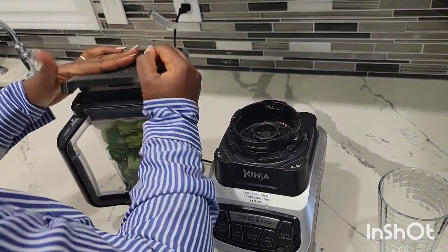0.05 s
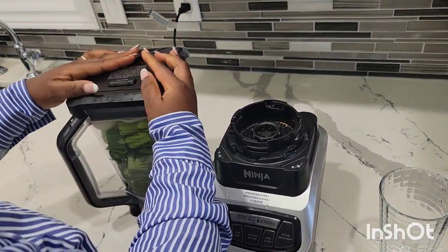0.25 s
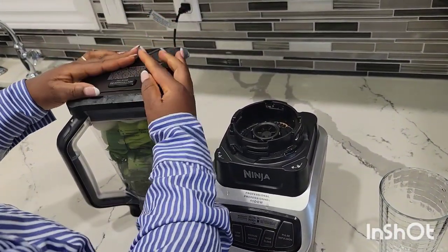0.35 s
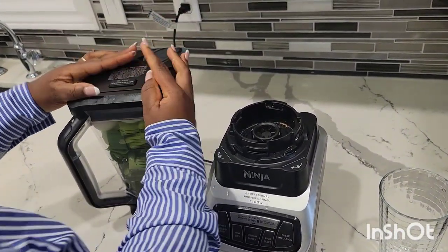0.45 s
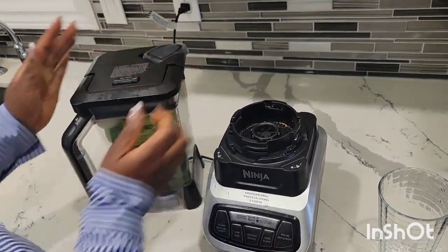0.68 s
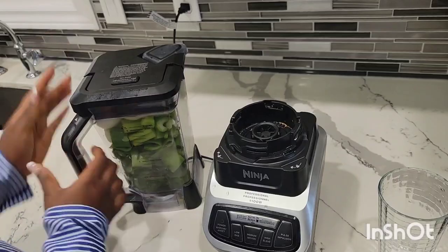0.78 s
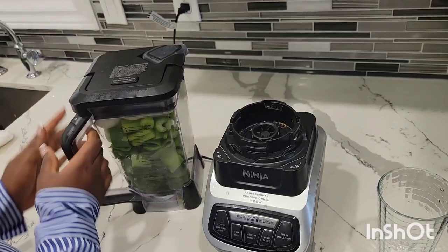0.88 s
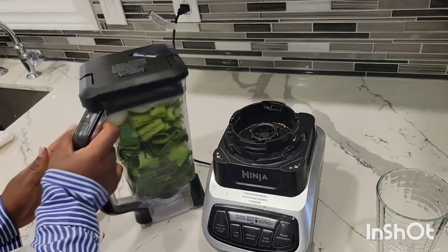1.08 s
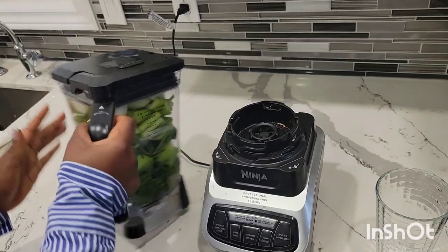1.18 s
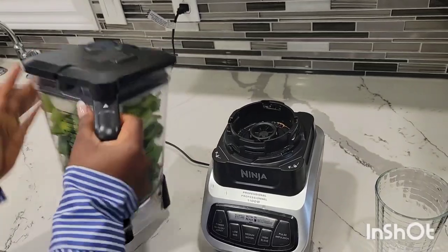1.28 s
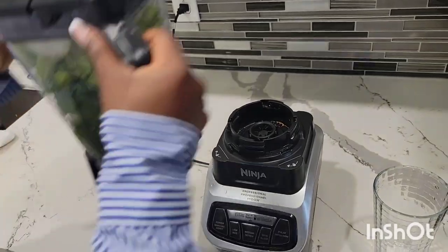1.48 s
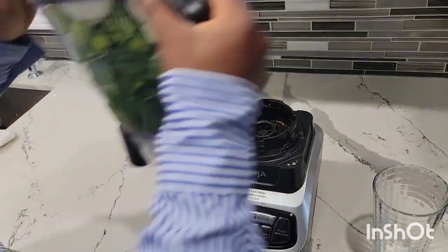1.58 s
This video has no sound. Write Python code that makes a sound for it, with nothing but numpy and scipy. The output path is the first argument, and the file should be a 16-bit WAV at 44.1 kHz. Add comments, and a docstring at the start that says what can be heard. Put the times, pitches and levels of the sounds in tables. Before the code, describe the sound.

One sharp plastic snap closes a blender lid, with small clicks before and after. Then come a dull bump, a short scrape and faint handle ticks, near the microphone in a small, slightly echoing kitchen, with soft hand rubbing.

```python
"""In a small, hard, quiet kitchen, a plastic blender lid is pressed onto its jar. It ticks, snaps home
and creaks as it settles: each contact makes the plastic crack, clatter and ring. The jar is then
gripped, bumps and skids on the stone counter and is lifted, its handle ticking under the weight.
Fingers pat the plastic, and hands and sleeves rub. The jar stands to the left; the room echoes it."""
import sys
import numpy as np
from scipy import signal
from scipy.fft import rfft, irfft, next_fast_len
from scipy.io import wavfile
from scipy.ndimage import map_coordinates

SR = 44100
rng = np.random.default_rng(int(sys.argv[2]) if len(sys.argv) > 2 else 0)


def dump(signal):
    """Clip the signal to [-1, 1] and save it as 16-bit WAV at the path in sys.argv[1]."""
    limited = np.clip(np.atleast_2d(signal).T, -1, 1)
    pcm = np.round(limited * 32767).astype(np.int16)
    wavfile.write(sys.argv[1], SR, pcm)


N = 72765

# Plastic contacts of lid and jar. A fade time (t60) is how long a sound takes to drop by 60 dB.
# (time [s], level [dB], brightness [dB/octave], fade time [s], favoured pitch [Hz], treble limit [Hz])
CONTACTS = [(0.012, -34, 2.5, 0.061, 2100, 3640), (0.0489, -30.5, -2, 0.063, 1620, 7000),
            (0.079, -29.5, -1, 0.11, 2600, 6600), (.101, -30.5, -3, 0.061, 2020, 5000),
            (.159, -24, 0.5, 0.091, 4800, 9800), (0.174, -30.5, -3, 0.12, 2400, 7000),
            (0.1934, -28.5, -5.5, .05, 1900, 7000), (0.2173, -24.5, -9, 0.031, 1820, 5000),
            (.2225, -16, 2.5, 0.12, 1910, 7000), (.230, -0.5, 0.5, 0.041, 1255, 18100),
            (0.2359, -5, -1, 0.051, 1887, 14720), (0.478, -25, -5, 0.019, 1960, 2300),
            (0.504, -31, 2, 0.1, 2660, 18000), (0.527, -34, 0.5, 0.13, 1970, 15000),
            (0.538, -39, -7.5, 0.12, 2000, 14000), (0.577, -29.5, 0.5, 0.16, 1760, 14800),
            (0.596, -31, 0.5, 0.096, 1750, 14000), (0.609, -37.5, 6.5, 0.017, 1840, 12000),
            (.868, -44.5, -3, 0.085, 801, 3030), (1.023, -32.5, -1, 0.086, 3200, 14000),
            (1.038, -38.5, 4.5, 0.12, 3370, 5000), (1.138, -33, 2, .12, 2570, 7000),
            (1.631, -39.5, 7.5, 0.035, 1600, 4000)]


def lid_clicks():
    """Each contact cracks and clatters the shell, with its own brightness and treble limit."""
    # Tone of the shell's many short vibrations, and of the crack: (frequency [Hz], level [dB])
    shell_tone = [(60, -17.5), (180, -5), (400, -10), (700, -9), (1150, 1.5), (2100, -2.5), (2600, -8),
                  (4000, -14), (6300, -17.5), (9000, -22.5), (15000, -24.5)]
    crack_tone = [(300, -28), (1500, 6), (6000, 1), (10000, -15), (15000, -20)]
    out, hz = np.zeros((2, N)), np.geomspace(30, SR / 2, 200)
    for start, db, brightness, t60, favoured_hz, top_hz in CONTACTS:
        # each point of contact favours one part of the shell
        boost_db = 8.5 * np.exp(-(np.log2(hz / favoured_hz) / 0.21) ** 2)
        tone = np.column_stack([hz, look_up(shell_tone, hz) + boost_db])
        clatter = amp(-7) * shape_tone(puff(t60), tone, brightness)
        crack = amp(-17.5) * shape_tone(puff(t60=0.0019), crack_tone, brightness)
        soften = signal.butter(2, top_hz, fs=SR)
        add(out, start, amp(db) * signal.lfilter(*soften, clatter + crack))
    return out


def lid_ring():
    """The same contacts make the lid ring and stir one low hum of the room."""
    # The lid's ringing notes, plus one low hum of the room: (pitch [Hz], level [dB], fade time [s])
    notes = [(226, -17, .52), (508, -25, .28), (767, -19, .15), (948, -9, .06), (1190, -17, .25),
             (1244, -3, .07), (1335, -20, .16), (1427, -19, .2), (1660, -4, .3), (1696, -4, .16),
             (1938, -4, .26), (2110, -2, .06)]
    out, t = np.zeros((2, N)), clock()
    for start, db, brightness, *_ in CONTACTS:
        ring = np.zeros_like(t)
        for hz, note_db, t60 in notes:
            strength = amp(note_db - 0.1 * rng.normal())
            ring += strength * fade(t60) * np.sin(2 * np.pi * (hz * t + rng.random()))
        add(out, start, amp(db - 13 - abs(brightness)) * ring * rise(0.00027))
    return out


def jar_bumps():
    """The full jar bumps on its feet; some bumps wake the room's low boom."""
    # Soft bumps on the counter: (time [s], level [dB], pitch [Hz], fade time [s])
    bumps = [(.082, -51.5, 211.7, 0.36), (0.122, -34.5, 198, 0.058), (0.2235, -28, 189, 0.1),
             (0.483, -33.5, 185, 0.044), (0.494, -39, 95, 0.098), (.602, -37.5, 88, 0.11),
             (.828, -53, 112, 0.089), (.875, -50.5, 90, 0.086), (0.983, -44, 91, 0.04),
             (1.027, -20.5, 162, 0.04), (1.04, -22, 121, 0.055), (1.051, -24.5, 70.5, 0.06),
             (1.0872, -32.5, 85, 0.094)]
    # The dull noise in each bump: (frequency [Hz], level [dB])
    thud_tone = [(40, 0), (200, -1.5), (400, -15), (800, -15.5), (2000, -47), (8000, -72)]
    # The room booming: (time [s], level [dB], fade time [s])
    booms = [(.24, -31, 0.31), (0.604, -48, 0.51), (1.037, -41, 0.64)]
    out, t, room_hz = np.zeros((2, N)), clock(), 65
    for start, db, hz, t60 in bumps:
        add(out, start, amp(db) * np.sin(2 * np.pi * hz * t) * fade(t60) * rise(0.0011))
        add(out, start, amp(db - 12) * shape_tone(puff(t60), thud_tone))
    for start, db, t60 in booms:
        add(out, start, amp(db) * np.sin(2 * np.pi * room_hz * t) * fade(t60) * rise(0.0027))
    return out


def foot_skid():
    """A foot of the jar squeaks briefly over the stone, roughened by uneven slips."""
    # Bands where the squeak rings: (centre [Hz], width [Hz], level [dB])
    bands = [(1730, 220, 0), (4000, 1000, -17), (7120, 650, -17.5), (14000, 5000, -20)]
    # Loudness of the skid: (time [s], level [dB])
    loudness = [(1.029, -74), (1.066, -45.5), (1.097, -38.5), (1.112, -41), (1.136, -45.5), (1.15, -53),
                (1.17, -72.5)]
    squeak = np.zeros((2, N))
    for centre, width, db in bands:
        band = filtered(stereo_noise(N), lambda hz: 1 / (1 + (2 * (hz - centre) / width) ** 2))
        squeak += amp(db) * unit(band)
    return unit(squeak * roughness(slips_per_s=900, depth_db=2.5)) * swell(loudness)


def handle_ticks():
    """The handle takes the weight; each dry tick is one sharp slip, heard straight ahead."""
    # Slips of the handle: (time [s], level [dB])
    ticks = [(1.3415, -32), (1.3585, -39), (1.3745, -37), (1.4025, -34), (1.4295, -40.5)]
    # Tone of a tick: (frequency [Hz], level [dB])
    tick_tone = [(300, -8), (1500, -3), (4000, 0), (6800, -3), (9000, -19), (12000, -32)]
    slips = np.zeros((2, N))
    for start, db in ticks:
        add(slips, start, np.array([amp(db)]))
    return shape_tone(slips, tick_tone)


def finger_pats():
    """Soft fingertips touch the plastic without making it ring."""
    # Touches: (time [s], level [dB])
    pats = [(.479, -37), (.560, -39), (.579, -37), (.777, -58.5), (1.326, -50), (1.362, -55.5),
            (1.395, -57), (1.435, -54.5), (1.531, -50.5)]
    # Tone of a touch: (frequency [Hz], level [dB])
    pat_tone = [(100, -5.5), (400, -5.5), (800, -1), (1300, -10.5), (3000, -46), (10000, -56)]
    out = np.zeros((2, N))
    for start, db in pats:
        touch = puff(t60=0.067)
        touch *= rise(0.004)[:touch.shape[1]]
        add(out, start, amp(db) * shape_tone(touch, pat_tone))
    return out


def hand_rubbing():
    """Hands and sleeves rub in many tiny, uneven slips."""
    # Loudness of the rubbing: (time [s], level [dB])
    loudness = [(0, -59.5), (.12, -62), (.2, -45.5), (.45, -59), (.55, -56), (.6, -46.5), (.65, -62),
                (.74, -58), (.86, -63.5), (.91, -72), (1.0, -64), (1.1, -55.5), (1.17, -53), (1.26, -68.5),
                (1.42, -63), (1.49, -58), (1.56, -59.5), (1.65, -57)]
    # Its tone: (frequency [Hz], level [dB])
    rub_tone = [(100, -3), (400, -0.5), (900, 5), (2000, 2.5), (3000, 0), (5500, -9), (9000, -19.5),
                (15000, -18.5)]
    slips = unit(roughness(slips_per_s=440, depth_db=1.5) * stereo_noise(N))
    return shape_tone(slips * swell(loudness), rub_tone)


def from_left(x):
    """Sound from the left reaches the left side earlier and, in the treble, louder."""
    # How much louder the left is: (frequency [Hz], left minus right [dB])
    balance = [(100, -2.2), (1000, -0.5), (2000, 0.5), (4000, 2), (8000, 4), (14000, 2.5)]
    # How much earlier the left is: (frequency [Hz], head start [s])
    lead = [(100, .0002), (500, 0.00016), (1200, 0.0004), (2000, 0.00017), (5000, .00017), (14000, .00016)]
    side = np.array([[0.5], [-0.5]])

    def response(hz):
        time_shift = np.exp(2j * np.pi * hz * side * look_up(lead, hz))
        return amp(side * look_up(balance, hz)) * time_shift
    return filtered(x, response)


def kitchen_echo(x):
    """Hard walls return bright echoes; a noise suppressor then cuts the tail short, treble first."""
    # How long the room rings: (frequency [Hz], fade time [s])
    fade_times = [(100, 0.3), (260, 0.99), (700, 0.71), (1840, 0.46), (4850, 0.67), (12800, 0.48)]
    # The suppressor's added fading after late_s: (frequency [Hz], fall [dB/s])
    suppressor_fall = [(250, 18), (800, 202), (2000, 198.5), (5000, 598), (12000, 798)]
    # Tone of the echo: (frequency [Hz], level [dB])
    echo_tone = [(70, -19), (120, -10), (165, -15), (240, -6), (520, -4.5), (900, -7.5), (1350, -9),
                 (1800, -4.5), (5000, -5.5), (13000, -8.5)]
    build_s, late_s = 0.0016, 0.18
    hz, t, noise = signal.stft(rng.standard_normal((2, SR // 2)), SR, nperseg=256)
    decay = np.exp(-np.log(1000) * t / look_up(fade_times, hz)[:, None])
    decay *= 1 - np.exp(-t / build_s)
    decay *= amp(-look_up(suppressor_fall, hz)[:, None] * np.maximum(t - late_s, 0))
    decay /= np.sqrt(np.mean(decay ** 2, axis=1, keepdims=True) * SR / 2)  # same energy in every band
    _, tail = signal.istft(noise * decay * amp(look_up(echo_tone, hz))[:, None], SR, nperseg=256)
    return signal.fftconvolve(x, all_around(tail), axes=1)[:, :N]


def background():
    """The quiet kitchen has a steady low rumble with a little hiss."""
    # Tone of the background: (frequency [Hz], level [dB])
    tone = [(25, 3), (65, 6.5), (100, -5.5), (160, -7), (250, -15), (440, -24.5), (900, -12.5), (1600, -31),
            (3800, -22.5), (8000, -21.5), (16000, -35)]
    noise = filtered(rng.standard_normal((2, N)), lambda hz: amp(look_up(tone, hz)))
    return unit(all_around(noise))


def all_around(pair):
    """Make two noises alike in the bass, like sound arriving from every direction."""
    # How alike left and right are: (frequency [Hz], likeness [0 to 1])
    likeness = [(120, 0.79), (300, 0.88), (700, 0.067), (3000, 0.033)]

    def shares(hz):
        angle = np.arccos(np.clip(look_up(likeness, hz), -1, 1)) / 2
        return np.array([np.cos(angle), np.sin(angle)])
    middle, side = filtered(pair, shares)
    return np.array([middle + side, middle - side])


def stereo_noise(n):
    """Noise that left and right share in the bass and partly share in the treble."""
    treble_apart, split_hz = 0.62, 405
    apart = lambda hz: treble_apart * hz ** 2 / (hz ** 2 + split_hz ** 2)
    common = filtered(rng.standard_normal(n), lambda hz: np.sqrt(1 - apart(hz)))
    return common + filtered(rng.standard_normal((2, n)), lambda hz: np.sqrt(apart(hz)))


def puff(t60):
    """A dying puff of noise."""
    return stereo_noise(SR // 8) * fade(t60)[:SR // 8]


def roughness(slips_per_s, depth_db):
    """The random flutter in loudness of a slipping surface."""
    position = np.arange(N) / SR * slips_per_s
    return amp(depth_db * map_coordinates(rng.standard_normal(N // 10), [position], mode="wrap"))


def swell(points):
    """A loudness curve through (time [s], level [dB]) points."""
    return amp(np.interp(np.arange(N) / SR, *np.transpose(points)))


def clock():
    """Half a second of sample times for one event."""
    return np.arange(SR // 2) / SR


def rise(seconds):
    """A smooth start, from 0 towards 1."""
    return 1 - np.exp(-clock() / seconds)


def fade(t60):
    """Die away by 60 dB in t60 seconds."""
    return np.exp(-np.log(1000) * clock() / t60)


def amp(db):
    """Turn decibels into a multiplier."""
    return 10 ** (np.asarray(db) / 20)


def unit(x):
    """Scale to an average power of 1."""
    return x / np.sqrt(np.mean(x ** 2) + 1e-20)


def look_up(points, hz):
    """Read between (frequency [Hz], value) points, spaced as musical pitch is."""
    frequencies, values = np.transpose(points)
    return np.interp(np.log(hz + 1), np.log(frequencies + 1), values)


def filtered(x, response):
    """Multiply each frequency in x by response(hz)."""
    n = x.shape[-1]
    padded = next_fast_len(n + 8192)
    return irfft(rfft(x, padded) * response(np.fft.rfftfreq(padded, 1 / SR)), padded)[..., :n]


def shape_tone(x, points, tilt_db=0, size=4096):
    """Give x a tone curve scaled to power 1, brightened by tilt_db per octave above 500 Hz."""
    hz = np.fft.rfftfreq(size, 1 / SR)
    gain = unit(amp(look_up(points, hz) + tilt_db * np.log2(np.maximum(hz, 500) / 1700)))
    # fold the filter forward in time, so that nothing sounds before the hit
    folded = irfft(np.log(gain + 1e-6))
    folded[1:size // 2] *= 2
    folded[size // 2 + 1:] = 0
    hit_response = irfft(np.exp(rfft(folded)))
    return signal.fftconvolve(x, hit_response[None], axes=1)[:, :x.shape[1]]


def add(out, start, x):
    """Mix x in at start seconds."""
    i = round(start * SR)
    out[:, i:i + x.shape[-1]] += x[..., :N - i]


def scene():
    """Lid, jar and hands in the kitchen, over its quiet background."""
    knocks = lid_clicks() + jar_bumps() + finger_pats()
    ring, rubs, squeak = lid_ring(), hand_rubbing(), foot_skid()
    quiet = amp(-66.5) * background()
    direct = from_left(knocks + ring + rubs + squeak) + handle_ticks()
    echo = kitchen_echo(knocks + amp(-6) * ring) + kitchen_echo(rubs + amp(-13.5) * squeak)
    return direct + echo + quiet


def record(dry):
    """Round off the loudest peaks, then cut the deepest bass and the highest treble."""
    low_hz, top_hz = 40, 16300
    rounded = dry / (1 + np.abs(dry) ** 6) ** (1 / 6)
    bass_cut = lambda hz: hz ** 2 / np.hypot(hz ** 2, low_hz ** 2)
    return filtered(rounded, lambda hz: bass_cut(hz) / (1 + (hz / top_hz) ** 120))


dry = scene()
out = record(dry)
dump(out)
```